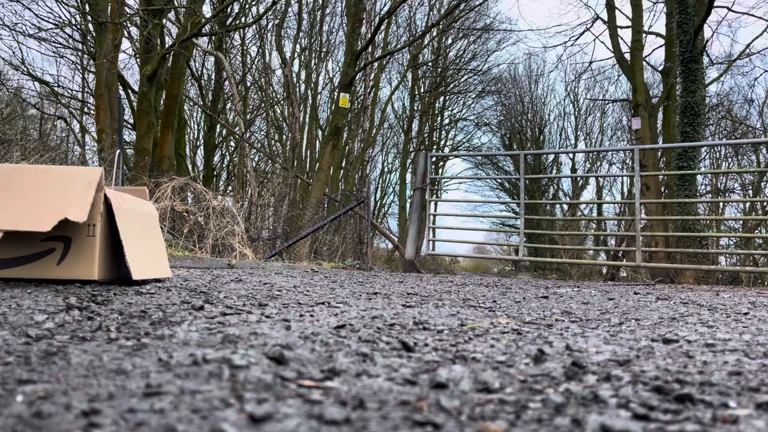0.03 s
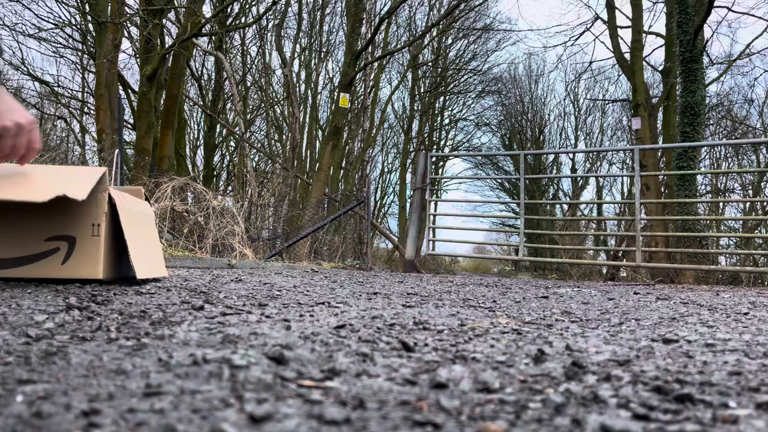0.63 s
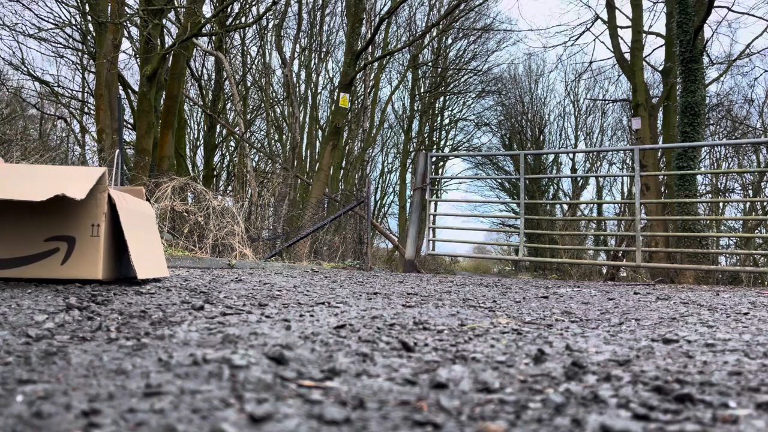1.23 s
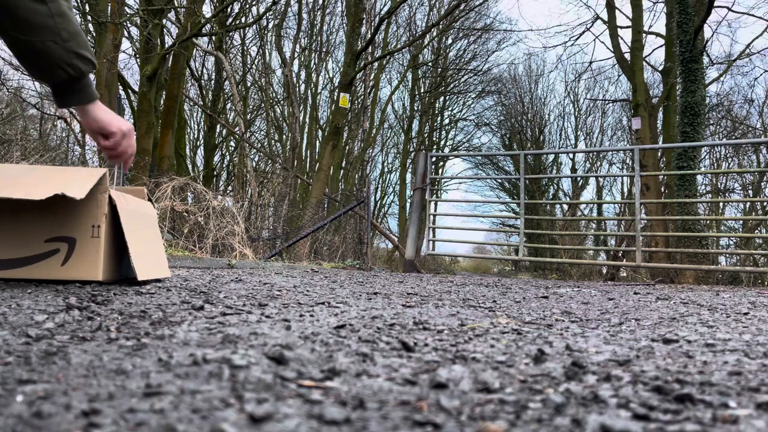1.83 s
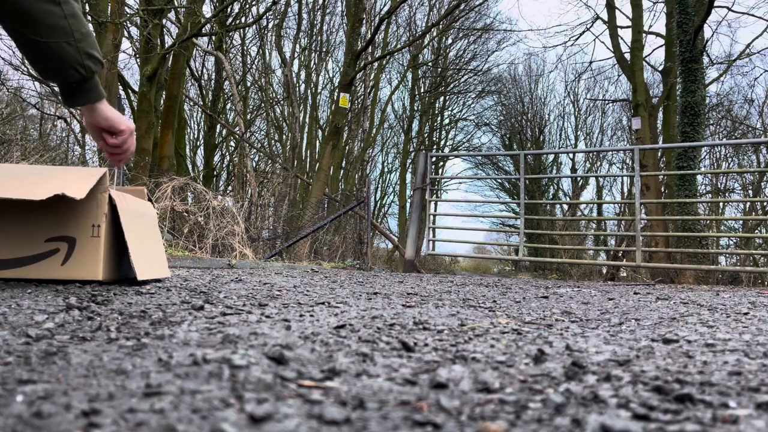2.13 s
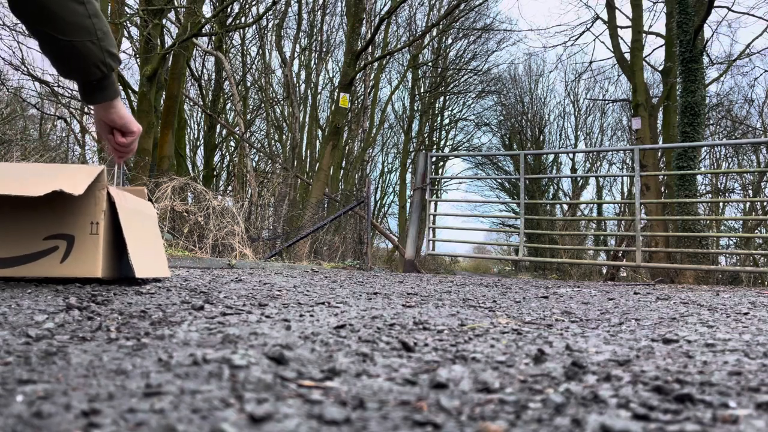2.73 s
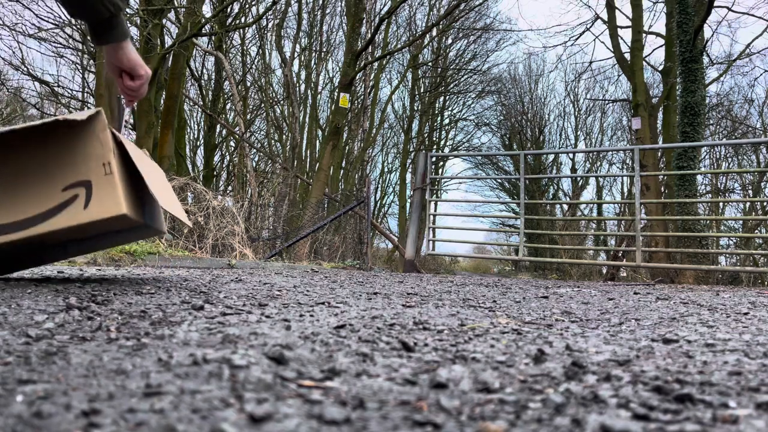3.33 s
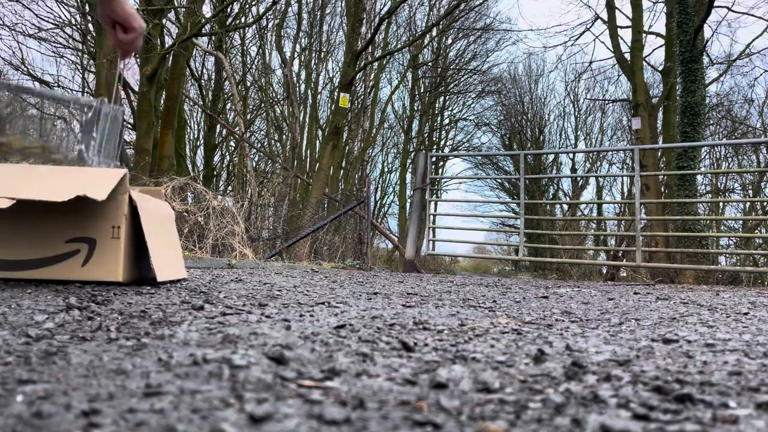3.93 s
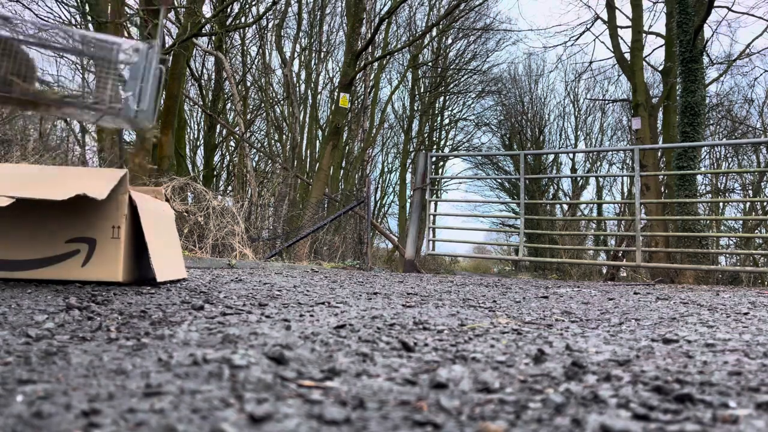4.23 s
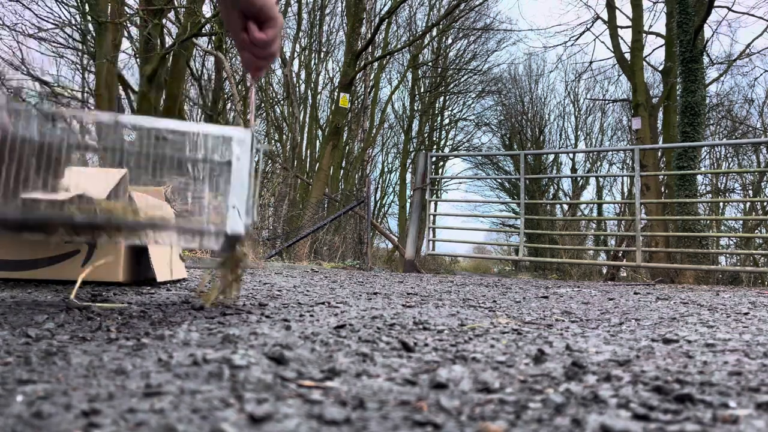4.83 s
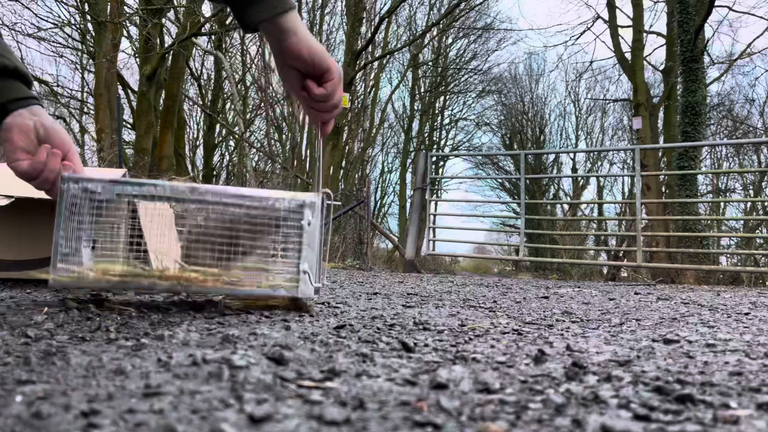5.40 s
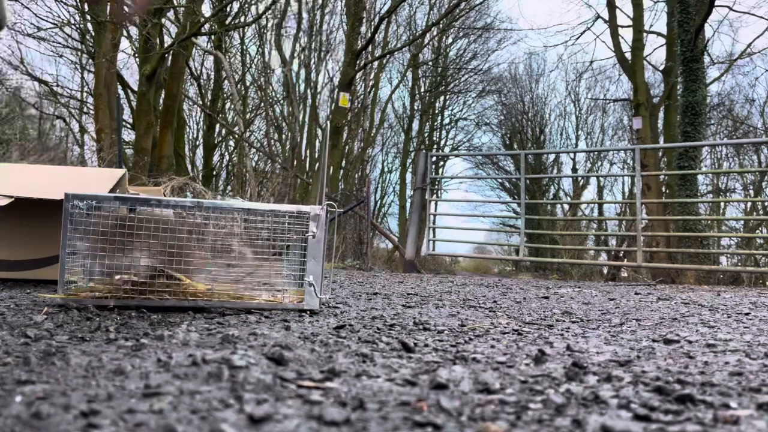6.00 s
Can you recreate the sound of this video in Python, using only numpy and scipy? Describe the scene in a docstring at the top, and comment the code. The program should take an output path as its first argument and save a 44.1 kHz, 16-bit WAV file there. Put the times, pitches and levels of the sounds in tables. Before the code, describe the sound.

Outdoors, close by and left of the microphone, a rat in a wire trap squeals again and again, shrill and raspy, sometimes grunting wheezily in between. Cardboard bumps come before the first squeal and return in the middle with one heavy thump. Sharp metallic ticks and rustling straw fill the second half. A few small birds chirp faintly over a steady rumble of breeze and far traffic.

```python
"""A trapped rat squeals

A rat in a wire trap is lifted out of a cardboard box and set down on a gravel lane, to the left.
Its voice box gives eight squeals that break from a clean whistle into a rasp as it strains,
and its throat flaps in grunts as it draws air between them. Knocked cardboard and wire ring
briefly and straw rustles, over a few small birds and the distant rumble of the open country."""
import sys
import numpy as np
from scipy import signal
from scipy.fft import rfft, irfft
from scipy.io import wavfile
from scipy.ndimage import uniform_filter1d

SR = 44100
rng = np.random.default_rng(int(sys.argv[2]) if len(sys.argv) > 2 else 0)


def store_wav(level_fs):
    """Save 16-bit WAV to argv[1]."""
    pcm = np.round(np.clip(np.atleast_2d(level_fs), -1, 1) * 32767)
    wavfile.write(sys.argv[1], SR, pcm.T.astype(np.int16))


N = 271656
TIME = np.arange(N) / SR
FREQS = np.arange(N // 2 + 1) * SR / N

# Tone of the distant rumble and breeze. Each row: frequency in Hz, relative level in dB.
COUNTRY_TONE = [(20, -28), (40, -11.5), (60, 3), (80, 3), (105, -0.5), (160, -11.5), (300, -13),
                (500, -14.5), (850, -7.5), (1300, -15.5), (2000, -22), (3200, -32.5), (6000, -41),
                (11000, -52.5), (12800, -87)]
# The open air comes more from the left. Each row: frequency in Hz, left minus right in dB.
COUNTRY_BALANCE = [(60, 2), (150, -0.5), (500, 3.5), (900, 2.5), (1400, 2.5), (5000, 3), (8500, 0)]
# How alike the open air is on both sides. Each row: frequency in Hz, likeness from 0 to 1.
COUNTRY_LIKENESS = [(100, 0.95), (200, 0.75), (400, 0.44), (800, 0), (3000, 0.13), (8000, 0)]
# Bird chirps. Each row: start and length in seconds, first and last pitch in Hz, level in dB,
# width of the buzz in Hz.
CHIRPS = [(0, 0.1, 7330, 6900, -50.5, 880), (0.827, 0.056, 5000, 4540, -56, 450),
          (0.876, 0.18, 2920, 2800, -59.5, 20), (0.93, 0.13, 4660, 5120, -56, 530),
          (3.22, 0.046, 6600, 6360, -46, 57), (3.96, 0.096, 6740, 6350, -44.5, 60),
          (4.033, 0.034, 6550, 6600, -52, 60), (4.105, 0.13, 6770, 6530, -48, 83)]
# Straw and mesh shift as the trap moves. Each row: start and length in seconds, level in dB.
SHUFFLES = [(.04, 0.47, -61.5), (0.246, 0.17, -60.5), (0.994, 0.28, -68), (1.66, 0.053, -52.5),
            (2.454, 0.025, -60), (3.2, 0.57, -53.5), (3.5, 0.053, -39.5), (3.834, 0.036, -42.5),
            (4.085, 0.29, -45), (4.468, 0.26, -46), (5.047, 0.21, -36), (5.58, 0.062, -42),
            (5.895, 0.27, -44.5)]
# Tone of the rustle. Each row: frequency in Hz, relative level in dB.
STRAW_TONE = [(400, 3.5), (1200, -0.5), (2200, 2.5), (3200, 5), (5000, 6), (6300, 4), (8000, 10.5),
              (10000, 13), (11500, 12.5), (12700, -16), (13700, -21)]
# Knocks on the box. Each row: start in seconds, level in dB, ring time multiplier, bass boost in dB.
KNOCKS = [(0.235, -29.5, 1.5, 8), (0.277, -26.5, 1.1, 4), (.299, -23, 0.46, -11), (0.315, -29, 1.1, -1),
          (0.3261, -19.5, 0.61, -24), (.335, -28, 0.29, -16), (0.418, -28.5, 3.1, 12),
          (.662, -30, 0.54, -9), (0.968, -31, 0.18, -37), (2.5135, -32, 1.2, -13), (2.546, -34.5, 1.8, -11),
          (2.657, -30.5, 1.4, 3), (3.216, -30.5, 0.46, 4), (3.285, -28.5, 3.1, 3), (3.338, -27.5, 3.8, -1),
          (3.458, -27, 1.8, 4), (3.477, -24.5, 1.2, 5), (3.522, -12, 0.95, 13.5), (3.58, -29.5, 2.9, 26),
          (3.865, -31, 0.99, -24), (3.89, -24.5, 0.24, -29), (3.949, -18.5, 0.32, -58.5),
          (4.024, -31, 0.96, 18), (4.216, -31, 0.26, -31), (4.338, -25.5, 0.43, -57),
          (4.503, -22.5, 1, 12.5)]
# Notes the box rings at. Each row: frequency in Hz, relative level in dB, ring time in seconds.
BOX_MODES = [(52, -16, 0.098), (103, -7.5, 0.065), (145, 1.5, 0.028), (194.4, -5, 0.068), (360, 7.5, 0.044),
             (485, -2, 0.02), (570.5, -3.5, 0.088), (655, 7, 0.068), (793, 6, 0.054), (930, 14, 0.016),
             (1113, 10.5, 0.012), (1360, 0, 0.068), (1660, -2, 0.035)]
# Tone of crunching cardboard. Each row: frequency in Hz, relative level in dB.
CRUNCH_TONE = [(150, -20), (500, 26.5), (1000, -20), (1800, 5.5), (3000, 3.5), (6000, -8), (11000, -17),
               (13500, -47)]
# Ticks on the wire. Each row: start in seconds, level in dB.
TICKS = [(0.2937, -43), (0.598, -43.5), (0.6609, -47), (0.705, -43), (0.786, -43.5), (0.9677, -56),
         (3.233, -36), (3.299, -36.5), (3.456, -28), (3.4754, -32), (3.5234, -42), (3.8886, -27.5),
         (3.925, -41), (3.948, -25), (4.013, -32), (4.337, -19.5), (4.575, -29), (4.7214, -51),
         (5.0975, -21.5), (5.1623, -30), (5.1986, -14), (5.2078, -17.5), (5.6472, -28), (5.653, -27),
         (5.8052, -26.5), (6.0904, -26), (6.128, -18)]
# Notes the mesh rings at. Each row: frequency in Hz, relative level in dB, ring time in seconds.
WIRE_MODES = [(3010, -3, 0.045), (3820, -21, .035), (4030, -27, .025), (5050, -6, .03), (6220, 15, 0.0073),
              (7260, 18, 0.0099), (8560, 16.5, 0.043), (9370, 3, .025), (10100, 9, 0.03),
              (11350, 13, 0.062)]
# The squeals. Each row: start and end in seconds, base levels of the low, middle and treble bands
# in dB, treble swell in dB per second, hoarseness and throb from 0 to 1, left minus right in dB.
SQUEALS = [(1.22, 1.746, -36.5, -49, -38.5, 14, 0.06, 0.45, 6),
           (1.955, 2.494, -37, -49, -38, -1, .08, 0.52, 10),
           (2.701, 3.209, -36.5, -52, -39.5, 3, 0.06, 0.33, 20),
           (3.494, 3.871, -30.5, -46, -30.5, 15, 0.17, 0.28, 10),
           (4.069, 4.552, -36.5, -48.5, -27, -6, 0.08, 0.4, 9),
           (4.765, 5.135, -33.5, -44, -33.5, 0, 0.15, 0.2, 22),
           (5.243, 5.623, -31, -36, -27, -8, 0.14, 0.24, 5),
           (5.826, 6.251, -30, -39, -25, -42, 0.13, 0.19, 22)]
# The pitch each squeal holds, one list per squeal. Each point: time in seconds, pitch in Hz.
HELD_PITCHES = [
    [(1.245, 2480), (1.33, 2790), (1.49, 3060), (1.56, 3050), (1.6, 2910), (1.675, 2810)],
    [(2.02, 2525), (2.1, 2800), (2.23, 2820), (2.322, 2965), (2.4, 2764), (2.445, 2740)],
    [(2.743, 2380), (2.83, 2690), (2.89, 2690), (2.955, 2900), (3.02, 2560), (3.09, 2520), (3.168, 2730)],
    [(3.6, 2450), (3.7, 2600), (3.747, 2806), (3.775, 2570), (3.84, 2460)],
    [(4.15, 2505), (4.19, 2400), (4.29, 2520), (4.342, 2625), (4.444, 2700), (4.479, 2440), (4.51, 2498)],
    [(4.812, 2514), (4.862, 2565), (4.914, 2496), (4.99, 2590), (5.047, 2360), (5.078, 2540)],
    [(5.32, 2380), (5.4, 2620), (5.49, 2743), (5.541, 2514), (5.585, 2690)],
    [(5.889, 2466), (5.912, 2340), (5.96, 2530), (6.028, 2440), (6.1, 2525)],
]
# The strained voice turns rough. Each row: start, end and build-up in seconds; rasp, period doubling
# and undertone from 0 to 1; first and last screech pitch in Hz; low and treble boosts in dB.
BREAKS = [(1.215, 1.505, 0.032, 0.93, 0.06, 0, 2827, 3290, 2.5, 2.5),
          (1.56, 1.61, 0.028, 0.4, .08, 0, 3150, 3100, 5, 1),
          (2.025, 2.112, 0.052, 0.71, 0.24, 0.1, 3050, 3100, 0, 2),
          (2.1, 2.15, 0.0068, 0.09, 0.24, 0, 3150, 3200, 3.5, 5.5),
          (2.145, 2.218, 0.01, 1, 0.05, 0, 3230, 3130, 11, 4),
          (2.255, 2.33, 0.009, 0.14, 0.15, 0.01, 3100, 3100, 2, 2.5),
          (2.96, 3.092, 0.055, 0.94, 0.14, 0.44, 3464, 3150, 3, 2.5),
          (3.495, 3.59, 0.0055, 0.89, 0.01, 0, 3363, 3127, 2, -3),
          (3.585, 3.63, 0.0096, 0.58, 0.13, 0.2, 3200, 3200, 0, -2),
          (3.675, 3.79, 0.019, 0.49, 0.1, 0, 3400, 2900, 4.5, 0.5),
          (4.44, 4.53, 0.036, .25, 0.57, .25, 3600, 3550, 16.5, -1),
          (5.235, 5.312, 0.015, 0.75, 0.22, 0.24, 2695, 2800, 6.5, -6),
          (5.335, 5.502, 0.035, 0.82, 0.07, 0.36, 3394, 3590, 7, 3),
          (5.82, 5.905, 0.015, 0.68, 0.38, 0.16, 3000, 3000, 8, -2)]
# The rat briefly pushes harder. Each row: start and end in seconds, low and treble boosts in dB.
SHRIEKS = [(1.314, 1.5, 2, -0.5), (1.491, 1.578, 7, -5.5), (2.196, 2.229, 7, 3), (2.807, 2.915, 6, 4),
           (2.927, 2.99, 8.5, -5.5), (3.071, 3.103, 8, 1), (3.115, 3.178, 3.5, 6.5), (3.728, 3.781, 6.5, 1),
           (4.14, 4.248, 2, 2), (4.317, 4.399, -1.5, 6), (4.831, 4.889, 4, 7), (4.981, 5.115, 4, 6),
           (5.418, 5.486, 1, -1.5), (5.576, 5.616, 1, 5)]
# Overtones of the voice box. Each row: multiple of the pitch, relative level in dB.
OVERTONES = [(1, 0.5), (2, -6.5), (3, -1.5), (4, -2.5), (5, -13.5)]
# Extra tones when every second cycle is weaker, which is called period doubling.
# Each row: multiple of the pitch, relative level in dB.
DOUBLING_TONES = [(.5, -2), (1.5, 4), (2.5, 8), (3.5, 3), (4.5, -3)]
# Tone of rough airflow ringing in the throat. Each row: frequency in Hz, relative level in dB.
RASP_TONE = [(1200, -1.5), (2100, -18), (2600, -6), (3200, 1.5), (3700, -17.5), (4400, -1), (5200, -1.5),
             (6200, 6), (7200, 7.5), (8300, 9), (9300, -4.5), (11000, -1.5), (13000, -7.5)]
# How the throat shapes the voice. Each row: frequency in Hz, gain in dB.
THROAT_TONE = [(1000, -9), (2500, 4.5), (4000, 9.5), (5200, -5), (6300, -12), (7000, -3.5), (7900, 6.5),
               (9000, 14), (10200, 12), (11500, 16), (12500, 6.5), (13300, -8), (14000, -39)]
# A throat peak and dip that the second overtone sweeps through.
# Each row: centre and width in Hz, gain in dB.
THROAT_PEAK_AND_DIP = [(4580, 740, 7.5), (6020, 360, -9)]
# Grunts. Each row: start and end in seconds, first and last pitch in Hz, level in dB,
# wheeze compared with the tone in dB.
GRUNTS = [(1.73, 1.815, 325.3, 386.4, -40, -10.5), (1.835, 1.945, 349, 459, -40.5, -12.5),
          (4.56, 4.635, 519, 352.2, -39.5, -12), (4.64, 4.742, 469.7, 574, -33.5, -24),
          (5.135, 5.235, 489.3, 331.7, -33, -9.5), (5.63, 5.812, 484, 515, -30.5, -5.5)]
# Tone of air drawn through the narrow throat. Each row: frequency in Hz, relative level in dB.
WHEEZE_TONE = [(200, -24), (500, 6.5), (900, -10), (1500, -15), (2000, -10.5), (2450, -35), (3100, -6),
               (3700, -15.5), (4500, -12.5), (6500, -18), (8000, -18.5), (11000, -23), (13500, -44)]
# Phase between a phone's two microphones. Each row: frequency in Hz, lead of the left in radians.
MIC_PHASE = [(100, 0), (500, .1), (900, -1.1), (1600, -.6), (2600, -.2), (3500, .5), (5100, 1), (6400, .2),
             (7600, 1.1), (8800, -.1), (10200, -3.1), (11900, -6.2), (13000, -6.9)]


def undb(db):
    """Turn decibels into a multiplier."""
    return 10 ** (np.asarray(db) / 20)


def unit(x):
    """Scale a signal to a typical size (rms) of 1."""
    return x / np.std(x)


def across(points):
    """Join (Hz, value) points into a curve over all frequencies."""
    hz, value = np.transpose(points)
    return np.interp(np.log(FREQS + 1), np.log(hz), value)


def colour(x, points):
    """Shape the tone of a sound with (Hz, dB) points."""
    return irfft(rfft(x) * undb(across(points)), N)


def noise(points):
    """Noise of size 1 with the given tone."""
    return unit(colour(rng.standard_normal(N), points))


def wander(hz):
    """A random wobble of size 1, mostly slower than hz."""
    return unit(irfft(rfft(rng.standard_normal(N)) / (1 + (FREQS / hz) ** 4), N))


def steady(x, seconds=0.009):
    """Even out the level, keeping only faster flutter."""
    size = int(seconds * SR)
    power = uniform_filter1d(uniform_filter1d(x * x, size), size)
    return x / np.sqrt(np.abs(power) + 1e-12)


def pan(x, db):
    """Place a sound between the speakers; positive dB is to the left."""
    left, right = undb(db / 2), undb(-db / 2)
    return np.array([x * left, x * right]) / np.sqrt((left ** 2 + right ** 2) / 2)


def fade(t, t60):
    """Die away by 60 dB every t60 seconds (the ring time)."""
    return np.exp(-np.log(1000) * t / t60)


def ring(modes, t, stretch=1, build_cycles=0.01):
    """An object struck at a random spot; its notes build up over cycles, so low ones come later."""
    out = np.zeros(len(t))
    for hz, db, t60 in modes:
        strength = undb(db) * rng.uniform(0.46, 1) * rng.choice([-1, 1])
        tone = np.sin(2 * np.pi * hz * rng.normal(1, 0.015) * t)
        rise_s = build_cycles / hz
        out += strength * tone * fade(np.abs(t - rise_s), t60 * stretch) * np.minimum(t / rise_s, 1)
    return out


def add(out, start, x, db):
    """Mix in a short sound at start seconds, peaking at db."""
    i = int(start * SR)
    out[i:i + len(x)] += (undb(db) * x / np.abs(x).max())[:N - i]


def current(rows):
    """Each column of an event table, held from one event's start to the next."""
    rows = np.array(rows)
    return rows[np.maximum(np.searchsorted(rows[:, 0], TIME) - 1, 0)].T


def envelope(start, end, attack, release):
    """Fade in, hold at 1, fade out; all times are in seconds."""
    return np.clip((TIME - start) / attack, 0, 1) * np.clip((end - TIME) / release, 0, 1)


def glide(start, end, first, last):
    """A straight slide from one value to another."""
    return first + (last - first) * np.clip((TIME - start) / (end - start), 0, 1)


def country(level_db=-39.5, swell_db=-0.65):
    """Far traffic and breeze in bare trees; the bass is alike on both sides."""
    likeness = np.clip(across(COUNTRY_LIKENESS), 0, 1)
    shared = rfft(noise(COUNTRY_TONE)) * np.sqrt((1 + likeness) / 2)
    opposed = rfft(noise(COUNTRY_TONE)) * np.sqrt((1 - likeness) / 2)
    lean = undb(across(COUNTRY_BALANCE) / 2)
    air = irfft([(shared + opposed) * lean, (shared - opposed) / lean], N)
    return air * undb(level_db + swell_db * wander(10))


def birds(buzz_hz=400, arch=0.0243):
    """Small birds in the trees give thin chirps that arch in pitch, some of them buzzing."""
    out, buzz = np.zeros(N), wander(buzz_hz)
    for start, length, first_hz, last_hz, db, width_hz in CHIRPS:
        t = TIME[:int(length * SR)]
        bow = np.sin(np.pi * t / length)
        hz = (first_hz + (last_hz - first_hz) * t / length) * (1 + arch * bow)
        hz += width_hz / 2 * buzz[int(start * SR):][:len(t)]
        add(out, start, np.sqrt(np.abs(bow)) * np.sin(2 * np.pi * np.cumsum(hz) / SR), db)
    return pan(out, db=2)


def straw(most_per_second=1300, spread_db=3.5, grain_t60=0.024, rest_db=-81, settle_t60=0.45):
    """Stalks snap and slide in tiny grains of noise, more of them when the trap moves hard."""
    motion = np.full(N, undb(rest_db))
    for start, length, db in SHUFFLES:
        rise = np.clip((TIME - start) / 0.032, 0, 1)
        motion += undb(db) * rise * fade(np.maximum(TIME - start - length, 0), settle_t60)
    rate = most_per_second * (motion / motion.max()) ** 0.48
    snaps = (rng.random(N) < rate / SR) * rng.choice([-1, 1], N)
    snaps = snaps * undb(spread_db * np.minimum(rng.exponential(size=N), 4))
    power = signal.fftconvolve(snaps ** 2, fade(TIME[:SR // 50], grain_t60) ** 2)[:N]
    grains = np.sqrt(np.abs(power)) * rng.standard_normal(N)
    return pan(steady(colour(grains, STRAW_TONE), seconds=0.25) * motion, db=1.4)


def cardboard(crunch_gain=0.46, crunch_t60=0.1, bass_hz=300):
    """Each knock rings the box and crunches its board; heavy ones bring out its low notes."""
    out, t = np.zeros(N), TIME[:SR // 4]
    grit = noise(CRUNCH_TONE)
    for start, db, stretch, bass_db in KNOCKS:
        modes = [(hz, mode_db + bass_db / (1 + (hz / bass_hz) ** 4), t60)
                 for hz, mode_db, t60 in BOX_MODES]
        crunch = np.roll(grit, rng.integers(N))[:len(t)] * fade(t, crunch_t60 * stretch)
        body = ring(modes, t, stretch, build_cycles=2.1)
        add(out, start, unit(body) + crunch_gain * unit(crunch), db)
    return pan(out, db=7.2)


def wire(snap_gain=0.71, snap_t60=0.072):
    """Handle, door and claws tick against the mesh and make it ring."""
    out, t = np.zeros(N), TIME[:SR // 8]
    grit = noise(STRAW_TONE)
    for start, db in TICKS:
        snap = np.roll(grit, rng.integers(N))[:len(t)] * fade(t, snap_t60)
        add(out, start, unit(ring(WIRE_MODES, t)) + snap_gain * unit(snap), db)
    return pan(out, db=1.8)


def squeal_pitch(first_hz=1955, last_hz=2300):
    """Each squeal scoops up to its held pitch and falls off at the end."""
    points = []
    for (start, end, *_), held in zip(SQUEALS, HELD_PITCHES):
        points += [(start, first_hz), *held, (end, last_hz)]
    return np.interp(TIME, *np.transpose(points))


def voice_box(hz, rasp, doubling, undertone, screech_hz, throb_depth, throb_hz=103):
    """The vocal folds make a throbbing whistle that gains in-between tones and rasps under strain."""
    waver = 0.0076 * wander(93.9)
    jitter = (0.0049 + 0.026 * rasp) * wander(515)
    phase = 2 * np.pi * np.cumsum(hz * (1 + waver + jitter)) / SR
    whistle = unit(sum(undb(db + 3 * wander(96)) * np.sin(k * phase) for k, db in OVERTONES))
    between = doubling * sum(undb(db) * np.sin(k * phase) for k, db in DOUBLING_TONES)
    between += undertone * np.sin(phase / 2)
    throb_phase = 2 * np.pi * np.cumsum(throb_hz * (1 + 0.1208 * wander(15.3))) / SR
    throb = 1 + throb_depth * np.sin(throb_phase)
    # In a rasp the folds jump to a higher, unsteady screech, with very short spurts of air.
    screech = np.sin(2 * np.pi * np.cumsum(screech_hz + 170 * wander(382)) / SR)
    screech *= np.abs(1 + 0.51 * wander(130))
    air = unit(noise(RASP_TONE) * undb(1.5 * wander(115)))
    rough = unit(rasp * unit(screech) + air)
    return np.sqrt(1 - rasp ** 2) * whistle * throb + between + rasp * rough


def throat(source, edges_hz=(4300, 6800)):
    """The throat shapes the voice, giving low, middle and treble bands, each at an even level."""
    voice = rfft(colour(source, THROAT_TONE))
    low, below_treble = (1 / (1 + (FREQS / edge) ** 20) for edge in edges_hz)
    return [steady(irfft(voice * band, N)) for band in (low, below_treble - low, 1 - below_treble)]


def squeals(easy_hz=2750, sag_db_per_s=13, catch_rasp=0.31, catch_s=0.049, rasp_pan_db=8.5):
    """Effort raises the rat's pitch and level together; breaks roughen the voice and shrieks lift it."""
    start, end, low_db, middle_db, treble_db, swell, hoarse, throb, pan_db = current(SQUEALS)
    (break_start, break_end, build, break_rasp, doubling, undertone,
     first_hz, last_hz, low_break_db, treble_break_db) = current(BREAKS)
    hz = squeal_pitch()
    broken = envelope(break_start, break_end, build, release=0.021)
    # The voice catches hoarsely before it settles on its note.
    hoarse = hoarse + catch_rasp * np.exp(-np.maximum(TIME - start, 0) / catch_s)
    rasp = np.clip(hoarse + broken * (break_rasp - hoarse), 0, 0.98)
    screech_hz = glide(break_start, break_end, first_hz, last_hz)
    low, middle, treble = throat(voice_box(hz, rasp, broken * doubling, broken * undertone,
                                           screech_hz, throb))
    octaves_up = np.log2(hz / easy_hz)
    past_centre_s = np.clip(TIME, start, end) - (start + end) / 2
    sweep_db = sum(db * np.exp(-((2 * hz - centre) / width) ** 2)
                   for centre, width, db in THROAT_PEAK_AND_DIP)
    # Each band grows by its own dB per octave; the low one sags as the air runs out.
    low_db = low_db + 41.5 * octaves_up - sag_db_per_s * past_centre_s + broken * low_break_db
    middle_db = middle_db + 14 * octaves_up + rasp + (1 - rasp) * sweep_db
    treble_db = treble_db + 22 * octaves_up + swell * past_centre_s + broken * treble_break_db
    for begin, stop, low_boost_db, treble_boost_db in SHRIEKS:
        push = envelope(begin, stop, attack=0.0049, release=0.0098)
        low_db += low_boost_db * push
        treble_db += treble_boost_db * push
    low_pan_db = pan_db + rasp * (rasp_pan_db - pan_db)
    bands = [(low, low_db, low_pan_db), (middle, middle_db, 5), (treble, treble_db, 0.5)]
    voice = sum(pan(band * undb(db + 0.4 * wander(18)), side_db) for band, db, side_db in bands)
    return voice * envelope(start, end, attack=0.0075, release=0.024)


def grunts(flap_hz=370, wobble=0.045, jitter=0.0515, flutter_db=1.5):
    """As the rat breathes in, its throat flaps slowly and unevenly, with a wheeze of air."""
    start, end, first_hz, last_hz, db, wheeze_db = current(GRUNTS)
    hz = glide(start, end, first_hz, last_hz)
    # Slower flaps are more uneven; they close harder and carry a stronger octave.
    uneven = (flap_hz / hz) ** 2 * (wobble * wander(40) + jitter * wander(167))
    octave = undb(-7) * 2 / (1 + (hz / flap_hz) ** 8)
    phase = 2 * np.pi * np.cumsum(hz * (1 + uneven)) / SR
    tone = unit(np.sin(phase) + octave * np.sin(2 * phase) + undb(-22) * np.sin(3 * phase))
    wheeze = noise(WHEEZE_TONE) * (1 + 0.5 * np.sin(phase)) * undb(wheeze_db)
    loudness = undb(db + flutter_db * wander(60)) * envelope(start, end, attack=0.017, release=0.018)
    return (pan(tone, db=10) + pan(wheeze, db=5)) * loudness


def echoes(stereo, near_t60=0.059, trees_t60=0.32):
    """Box and ground scatter the sound at once; the trees return a faint, dull tail."""
    t = TIME[:SR // 2]
    out = []
    for channel in stereo:
        near, trees = (unit(rng.standard_normal(len(t)) * fade(t, t60)) / np.sqrt(len(t))
                       for t60 in (near_t60, trees_t60))
        echo = signal.fftconvolve(channel, undb(-13) * near + undb(-30) * trees)[:N]
        out.append(colour(echo, [(3000, 8.5), (10000, 0.5)]))
    return np.array(out)


def scene():
    """Rat, box, trap and birds in the open air."""
    sources = squeals() + grunts() + cardboard() + wire() + straw() + birds()
    return sources + echoes(sources) + country()


def record(dry, silent_s=0.036, top_hz=13600):
    """A phone on the ground starts after a moment, shifts left and right in phase and cuts the top."""
    hz, radians = np.transpose(MIC_PHASE)
    turn = np.exp(0.5j * np.interp(FREQS, hz, radians))
    mics = irfft(rfft(dry) * np.array([turn, 1 / turn]), N) * (TIME > silent_s)
    return signal.sosfilt(signal.ellip(8, 0.2, 70, top_hz, fs=SR, output="sos"), mics)


dry = scene()
out = record(dry)
store_wav(out)
```